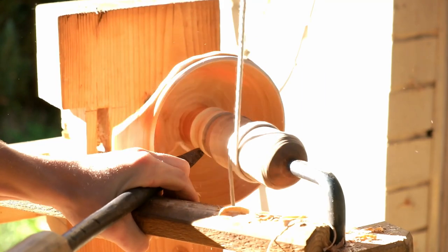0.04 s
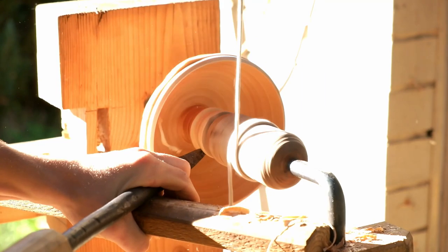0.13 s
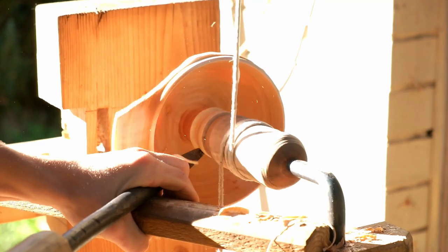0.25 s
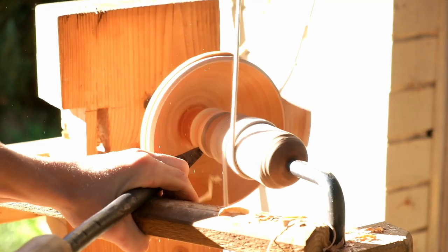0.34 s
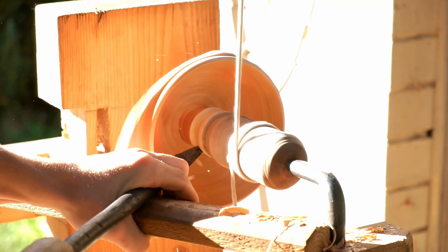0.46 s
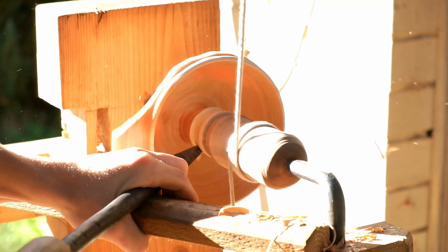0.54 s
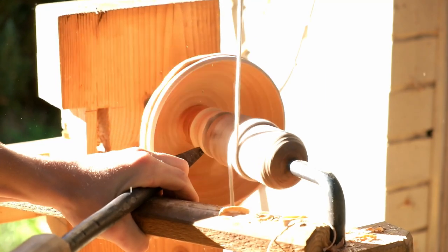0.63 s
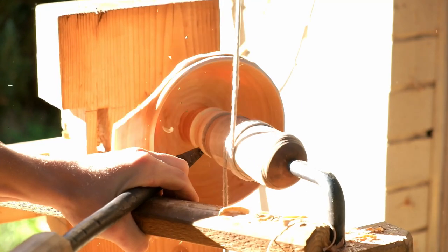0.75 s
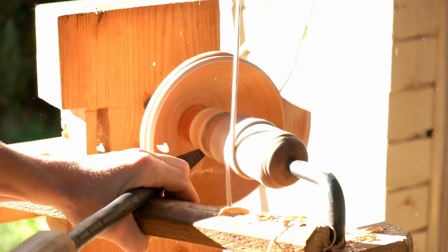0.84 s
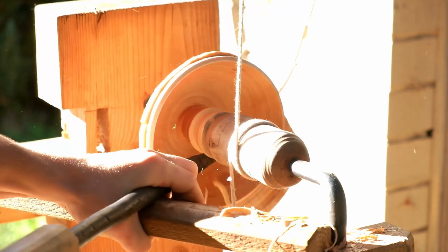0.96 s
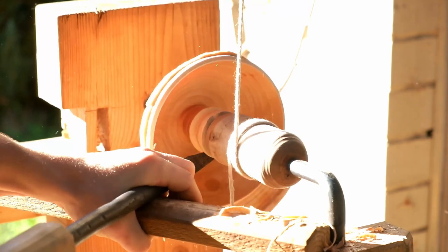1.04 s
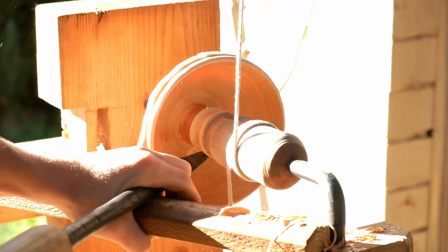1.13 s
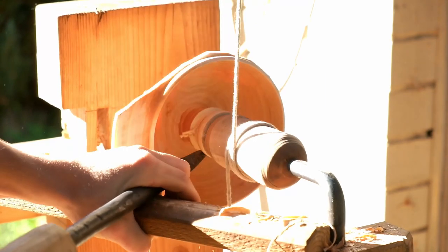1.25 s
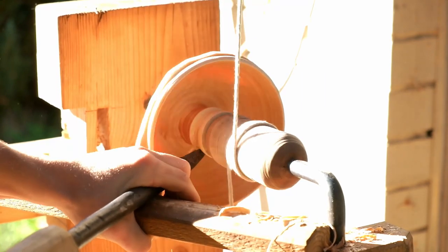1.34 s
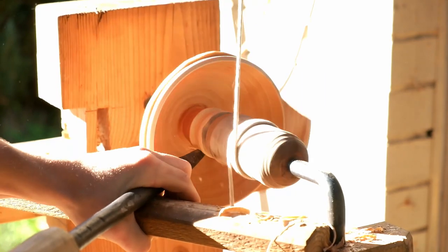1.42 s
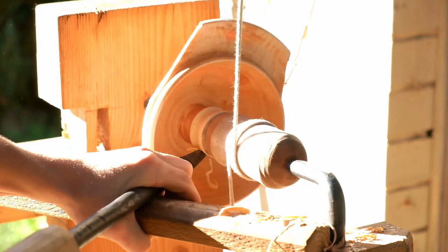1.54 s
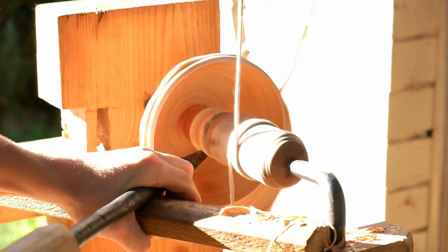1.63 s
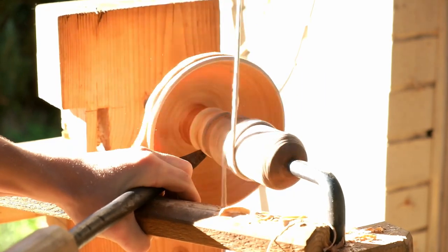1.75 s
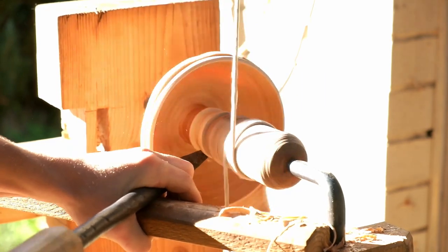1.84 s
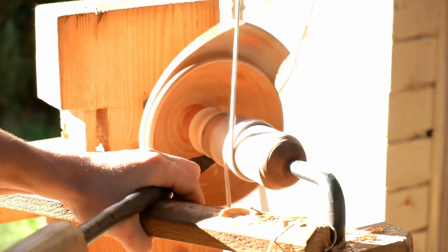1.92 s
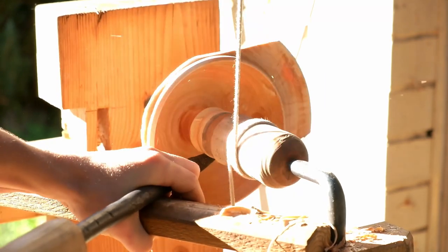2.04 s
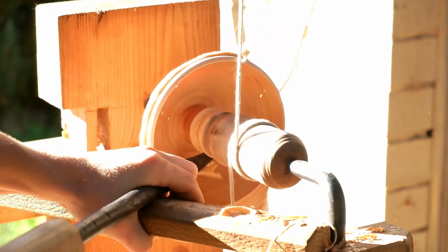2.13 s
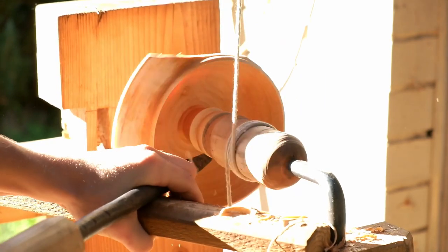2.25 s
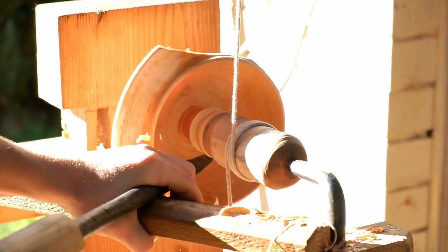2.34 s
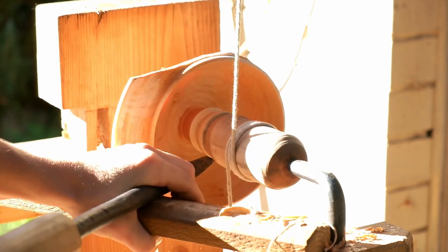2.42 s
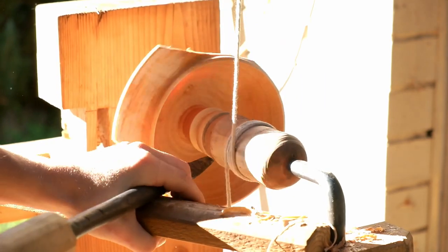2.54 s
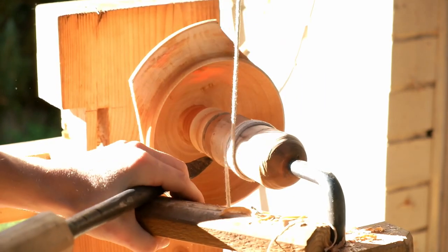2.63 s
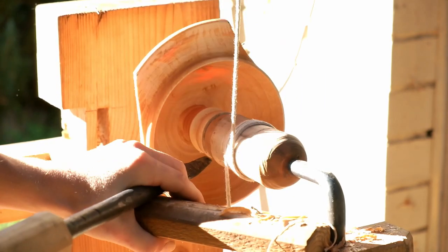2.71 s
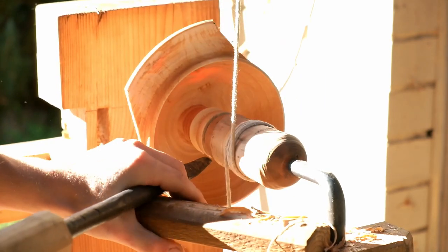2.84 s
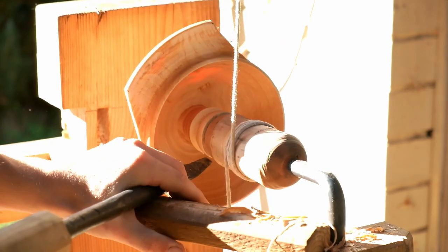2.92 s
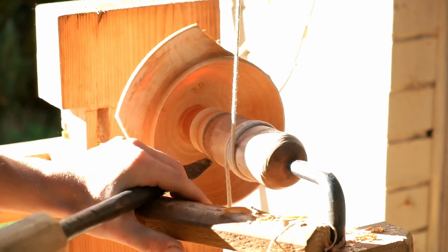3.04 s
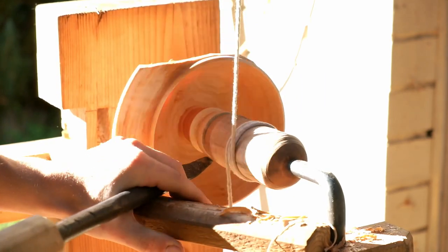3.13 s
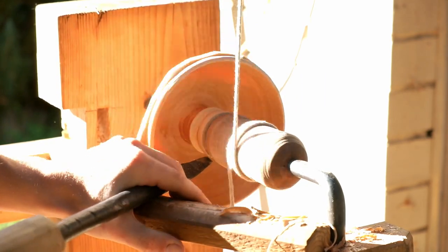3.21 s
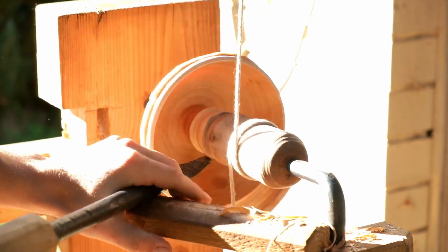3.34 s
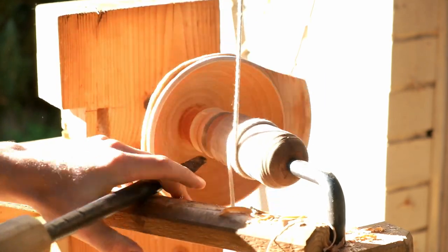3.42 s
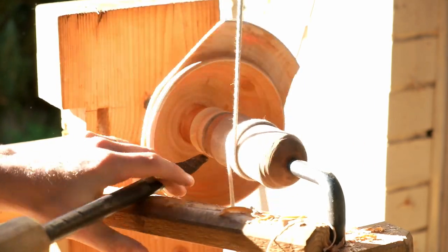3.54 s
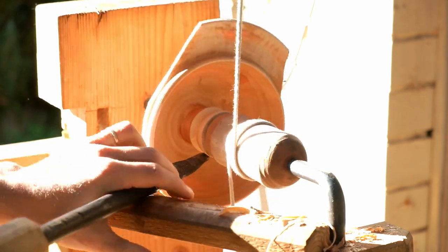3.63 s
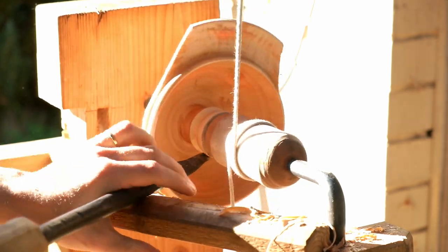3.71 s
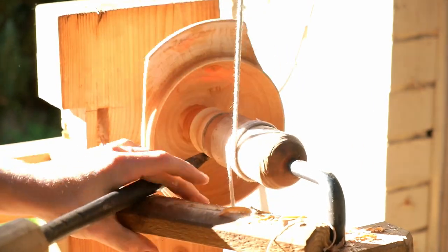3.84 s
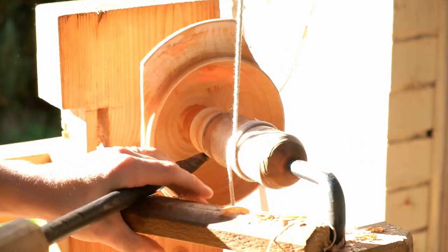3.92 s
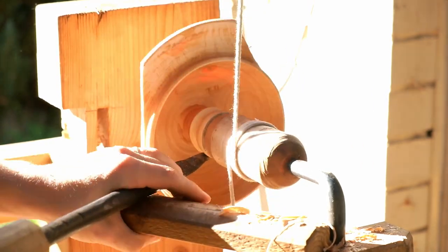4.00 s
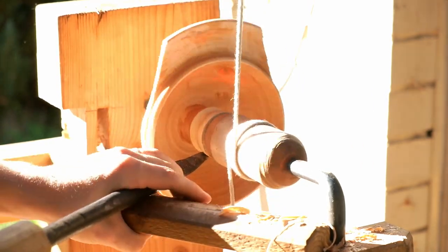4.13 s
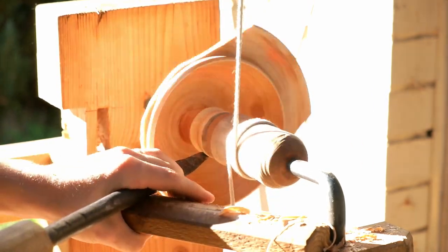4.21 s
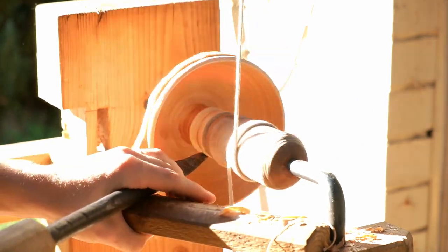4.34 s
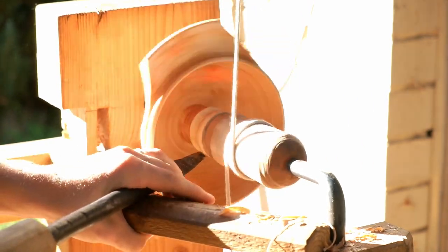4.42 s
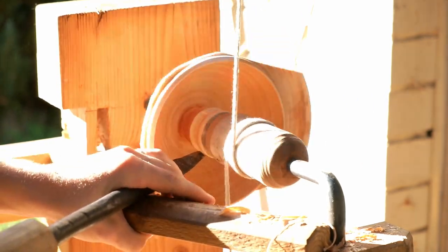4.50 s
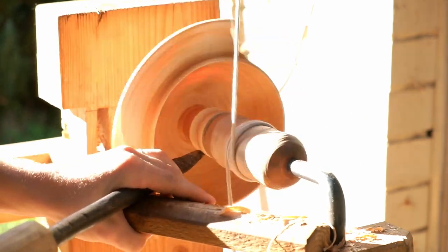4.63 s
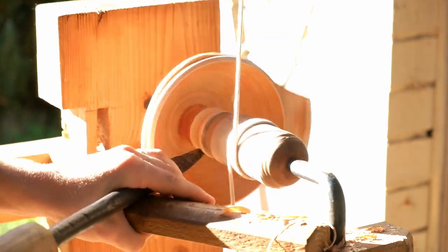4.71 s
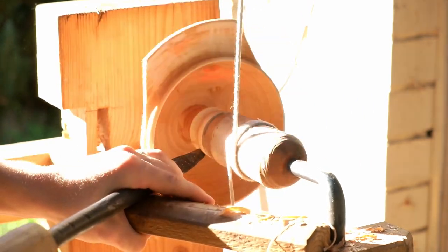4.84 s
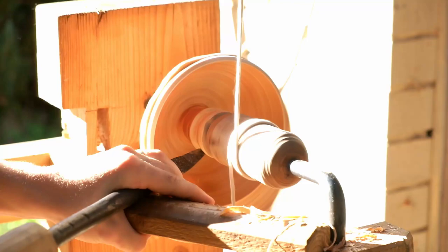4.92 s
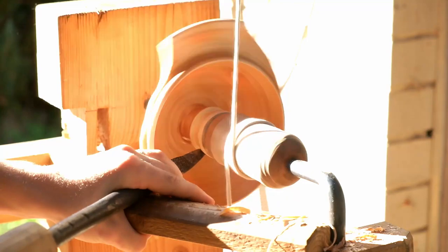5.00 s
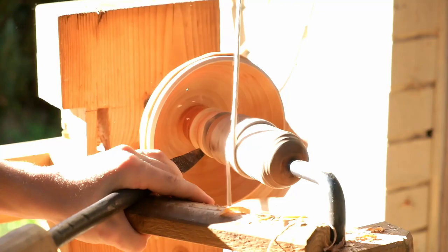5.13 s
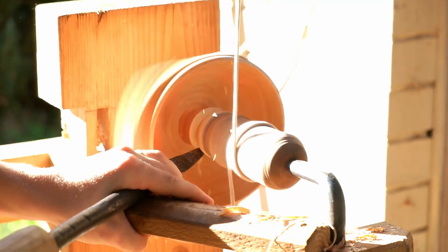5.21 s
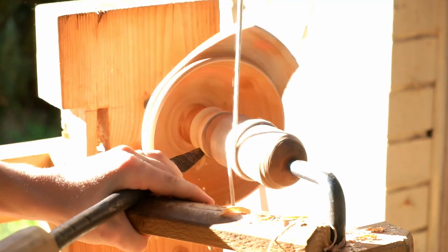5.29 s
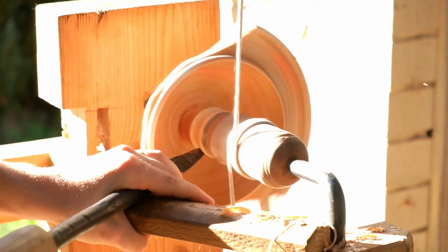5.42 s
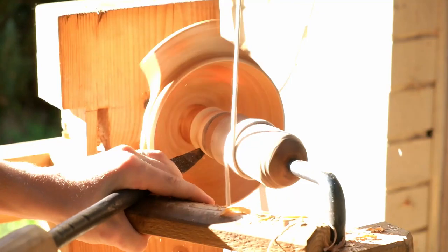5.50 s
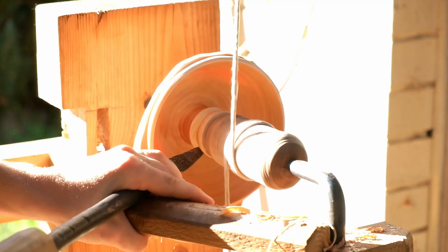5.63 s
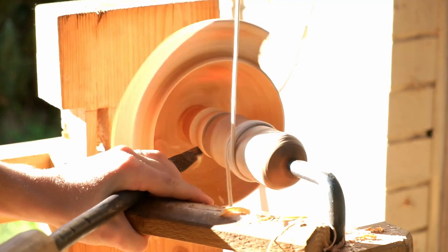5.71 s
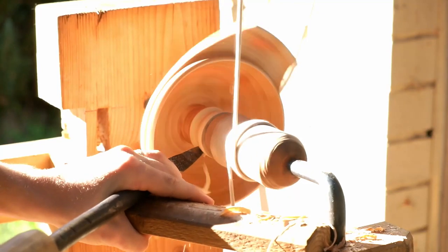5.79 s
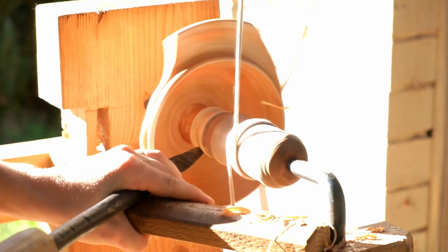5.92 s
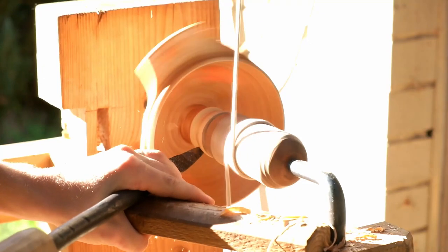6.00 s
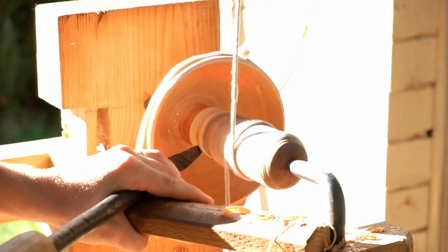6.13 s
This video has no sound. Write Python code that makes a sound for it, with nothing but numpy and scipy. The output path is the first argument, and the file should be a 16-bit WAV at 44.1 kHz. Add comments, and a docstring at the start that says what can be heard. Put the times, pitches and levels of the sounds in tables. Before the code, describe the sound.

In an open-sided shed, a treadle lathe turns wood against a steel edge. Crunchy, fibrous scrapes pulse steadily, bright with a hard metallic ring near four kilohertz and a hollow woody knock beneath. They give way to about two quiet seconds of faint clicks and distant low rumble, then small knocks lead into renewed, rhythmic scraping. Heard very close, fairly dry.

```python
"""Open-sided shed: a hook tool cuts a green-wood bowl on a treadle lathe, close to the microphone.
On each down-stroke snapping fibres ring lathe, bowl and tool; the edge bites harder a few times a stroke.
Between strokes the edge drags and ticks on the wood. Sources are random snaps and single blows through
resonances; short scattered echoes follow, over distant outdoor noise made by shaping a noise spectrum."""
import sys
import numpy as np
from scipy import signal
from scipy.fft import rfft, irfft
from scipy.io import wavfile
from scipy.ndimage import uniform_filter1d

SR = 44100
rng = np.random.default_rng(int(sys.argv[2]) if len(sys.argv) > 2 else 0)


def persist_wave(psi):
    """Save psi, clipped to +-1, as 16-bit WAV."""
    counts = np.round(np.clip(psi, -1, 1) * 32767).astype(np.int16)
    wavfile.write(sys.argv[1], SR, np.atleast_2d(counts).T)


N = 271656
T = np.arange(N) / SR

# Down-strokes of the treadle. Each row: start in seconds, then frame, blade and hiss levels in dB
# against the shank once the cut is loaded.
STROKES = [(-.15, -8, -2.5, -8), (.331, -13.5, -2.5, -10.5), (.83, -7.5, -3, -9.5), (1.385, -6, -6, -13.5),
           (1.859, -1, -2, -10), (4.772, -16, -11, -13.5), (5.189, -10, -7.5, -11),
           (5.675, -14.5, -7.5, -11)]


def undb(db):
    """Decibels to gain."""
    return 10 ** (np.asarray(db) / 20)


def unit(x):
    """Scale to rms 1."""
    return x / np.sqrt(np.mean(x ** 2))


def walk(rate_hz):
    """Random levels held 1 / rate_hz seconds and slewed; spread near 1."""
    hold = int(SR / rate_hz)
    steps = np.repeat(rng.standard_normal(N // hold + 1), hold)
    return 1.175 * uniform_filter1d(steps, hold)[:N]


def fibres(per_s, spread_db):
    """Fibres snap at random moments, a few much harder than the rest."""
    snaps = rng.random(N) < per_s / SR
    return snaps * rng.standard_normal(N) * undb(spread_db * rng.exponential(size=N))


def ring(x, modes, shift_db):
    """Two-pole resonances; as the bowl turns and the tool rolls, each is driven now harder, now softer."""
    out = 0
    for k, (hz, width_hz, db) in enumerate(modes):
        b, a = signal.iirpeak(hz, hz / width_hz, SR)
        driven = x * undb(db + shift_db * walk(40))
        out = out + (-1) ** k * signal.lfilter(b, a, driven)
    return out


def bite(start_s, shank_db, bowl_db, hold_ms):
    """The edge digs in; colour and swell follow from how far the stroke has gone."""
    stroke_s, load_s, unloaded_db = .21, .15, -18.5  # the frame takes the load slowly
    entry_swell_ms, loaded_swell_ms = 9.6, 24.1  # per 20 dB: sharp entry, smeared later
    return_frame_db, return_hiss_db, return_swell_ms = 2, -8, 13
    rest_db = -14  # tool rest against the blade
    fall_ms = 26.3  # per 20 dB

    stroke_start_s, frame_db, blade_db, hiss_db = [row for row in STROKES if row[0] <= start_s][-1]
    since_s = start_s - stroke_start_s
    load = min(since_s / load_s, 1)
    swell_ms = entry_swell_ms + load * (loaded_swell_ms - entry_swell_ms)
    if since_s > stroke_s:  # return touches tear fewer fibres and load the frame differently
        frame_db += return_frame_db
        hiss_db += return_hiss_db
        swell_ms = return_swell_ms
    frame_db += unloaded_db * (1 - load)
    parts_db = np.array([frame_db, bowl_db, 0, blade_db, hiss_db, blade_db + rest_db])
    return start_s, shank_db + parts_db, swell_ms, hold_ms, fall_ms


def tick(start_s, shank_db, bowl_db, treble_db, fall_ms):
    """A catch or falling chip: sudden and short."""
    swell_ms, hold_ms = .6, 2.57  # swell per 20 dB
    # Offsets in dB: frame against bowl, blade against shank, hiss against treble, rest against treble.
    offsets_db = [-12.5, -13, -1.5, 4.5]
    frame_db, blade_db, hiss_db, rest_db = np.array([bowl_db, 0, treble_db, treble_db]) + offsets_db
    parts_db = np.array([frame_db, bowl_db, 0, blade_db, hiss_db, rest_db])
    return start_s, shank_db + parts_db, swell_ms, hold_ms, fall_ms


def force():
    """Drive of frame, bowl, shank, blade, hiss and tool rest: rubbing (drag, bites, ticks) and single blows."""
    # Pressure of the dragging edge. Each row: time in seconds, nominal level in dB.
    drag = [(0, -51), (.1, -51.5), (.28, -57), (.56, -53.5), (.78, -54.5), (1.0, -50.5), (1.2, -65),
            (1.33, -78.5), (1.57, -59), (1.8, -57.5), (2.08, -57), (2.26, -59.5), (2.4, -79), (3.0, -79.5),
            (3.4, -77), (3.9, -77.5), (4.05, -84), (4.2, -67), (4.74, -77), (4.87, -59), (5.14, -66),
            (5.4, -58.5), (5.55, -66.5), (5.89, -55), (6.16, -63)]
    # Edge digging in. Each row: start in seconds, shank level in dB, bowl against shank in dB, hold in ms.
    bite_rows = [(0.0044, -34.5, 3, 20.6), (0.1964, -46, 2.5, 5.2), (0.2416, -52.5, 6, 6.3),
                 (0.338, -40.5, 2.5, 16), (0.358, -26.5, -2.5, 8.2), (0.393, -23.5, -6, 13.6),
                 (0.427, -20.5, 2, 8.7), (0.4647, -19.5, -1, 3.8), (0.498, -27.5, 2.5, 5.5),
                 (0.5183, -29, -1.5, 5.1), (0.7397, -49.5, 1, 8.3), (0.8354, -44.5, -8, 10),
                 (0.858, -30, -3, 28), (0.8984, -21, -4.5, 11.6), (0.9424, -19.5, -2, 11),
                 (0.9744, -34.5, -7, 5.3), (1.387, -40, -4, 32), (1.422, -34, -4, 19.5),
                 (1.45, -38.5, -3.5, 27), (1.493, -35, -3.5, 23.5), (1.52, -43.5, 1.5, 26),
                 (1.801, -46, 6.5, 4.4), (1.866, -36.5, -2.5, 17), (1.8863, -28, -5, 26),
                 (1.9633, -24, -5.5, 4.3), (1.989, -31.5, 1, 15), (2.02, -36, 3, 11), (2.048, -35, 4, 6.8),
                 (2.1104, -56, -8, 11), (4.778, -35, -3.5, 5.9), (4.791, -38, -5.5, 31),
                 (4.909, -52, 7, 7.1), (4.922, -46, 3.5, 17), (4.948, -55, 6, 3), (5.194, -53, 6, 12),
                 (5.225, -29, -4, 8.6), (5.255, -28, -7.5, 7), (5.274, -23.5, -7, 10.6),
                 (5.308, -33.5, 5.5, 13.5), (5.3467, -33, -2.5, 16.6), (5.4594, -47.5, 1.5, 4.8),
                 (5.68, -33, -6, 11), (5.696, -29, -2.5, 14), (5.744, -23.5, -17, 7.6),
                 (5.7674, -31.5, 6, 3), (5.784, -21, -12.5, 10.4), (5.812, -32.5, 2, 12),
                 (5.8423, -29.5, -2.5, 8.2), (5.9747, -43, 1, 5.9), (6.029, -40.5, 4.5, 2.8)]
    # Catches and falling chips. Each row: start in seconds, shank level in dB, bowl and treble against
    # shank in dB, fall in ms per 20 dB.
    tick_rows = [(1.158, -54, 2.5, -9, 51), (1.2572, -52, -10.5, -27.5, 10),
                 (1.655, -40.5, 3.5, -16.5, 8.3), (1.6933, -40.5, 7, -5, 17), (1.761, -53, 10.5, -11, 24),
                 (1.9405, -17, -2.5, -15, 11), (1.989, -28.5, -14, -4.5, 8.9), (2.188, -55, 2, -8, 47),
                 (2.2156, -33, -.5, -7.5, 14.6), (2.3371, -56, -14, -24, 11), (2.4492, -71.5, 2, -7, 19),
                 (2.582, -55.5, -11, -14, 16), (3.1184, -60, -2.5, -12.5, 14), (3.335, -59.5, 2, -17.5, 14),
                 (3.3504, -55.5, 0, -13, 28), (3.5247, -64, -7, -16, 10), (3.54, -59, -5, -15.5, 10),
                 (3.5717, -57.5, 6.5, -10.5, 9.3), (3.7717, -60.5, 3, -22.5, 15),
                 (4.2453, -51, 4.5, -17, 29), (4.2743, -42, 4.5, -11, 8.9), (4.4993, -52.5, 4, -22, 12),
                 (4.5214, -43.5, 5.5, -14, 12), (4.6705, -51.5, 4, -12.5, 17), (4.734, -60.5, 10, -9, 14),
                 (4.9877, -36.5, -2.5, -16, 30), (4.997, -29.5, -15, -16, 16), (5.0294, -52, -9, -7, 20),
                 (5.0673, -58, 10, -26, 9.8), (5.139, -54.5, 3, -17, 23), (5.5292, -51.5, 7, -31, 11),
                 (5.5636, -59, 15.5, -13, 21), (5.5979, -42.5, 3, -18, 15), (5.6291, -55, -6, -16, 14),
                 (5.727, -25.5, 5.5, -16, 9), (5.819, -36, -6, -8, 5.7), (6.0645, -43.5, 1, -14.5, 15),
                 (6.1235, -46.5, 3, -23, 14)]
    # Drag response, frame to rest: level in dB at a drag of -59.5 dB.
    drag_parts_db = [-57, -56, -58.5, -66.5, -74, -72.5]
    # Drag response, frame to rest: dB gained per dB of drag.
    drag_slopes = [0.61, 0.57, 1, 1.1, 1.1, 0.91]
    # First hard contact of a tick, frame to rest: dB over its rubbing.
    blow_db = [14.6, 15.4, 15.7, 6.6, 19, 16]
    lift_db, lift_ms = -9, 23  # the edge eases off around the start of each down-stroke

    lift = sum(np.clip(1 - np.abs(1000 * (T - row[0]) / lift_ms + .5), 0, 1) for row in STROKES)
    drag_db = np.interp(T, *np.transpose(drag)) + lift_db * lift + 59.5
    flutter_db = 3 * walk(30)
    crackle = 1 + 60 * uniform_filter1d(fibres(80, 1) ** 2, size=60)  # dry splinters flick the edge
    power = np.array([crackle * undb(db + slope * drag_db + flutter_db) ** 2
                      for db, slope in zip(drag_parts_db, drag_slopes)])

    bites = [bite(*row) for row in bite_rows]
    ticks = [tick(*row) for row in tick_rows]
    for start_s, db, swell_ms, hold_ms, fall_ms in bites + ticks:
        near = slice(max(int((start_s - .1) * SR), 0), int((start_s + .3) * SR))
        ms = 1000 * (T[near] - start_s)
        swell = np.minimum(ms, 0) / swell_ms
        fall = np.maximum(ms - hold_ms, 0) / fall_ms
        power[:, near] += undb(db[:, None] + 20 * (swell - fall)) ** 2

    blows = np.zeros_like(power)
    for start_s, db, *_ in ticks:
        blows[:, int(start_s * SR)] += undb(db + blow_db)
    return np.sqrt(power), blows


def cutting():
    """Snapping fibres and blows ring lathe, bowl and tool; fine snaps through high, broad bands are the hiss."""
    # Resonances of lathe frame, bowl, tool shank, blade, tearing fibres and tool rest.
    # Each row: centre in Hz, width in Hz, drive in dB relative to the other modes of its part.
    frame_modes = [(35, 51, -7), (129.8, 36.3, -9.5), (199.6, 43, -4.5), (305.4, 150, -3.5),
                   (418.5, 103, 3)]
    # Bowl, same columns: centre in Hz, width in Hz, relative drive in dB.
    bowl_modes = [(515.6, 54, -7.5), (721, 80, -5.5), (812.6, 52, 0), (916.4, 68, 3.5), (1055, 69.5, 3.5),
                  (1326, 104, 0), (1454, 94, -4), (1782, 406, -7)]
    # Tool shank, same columns: centre in Hz, width in Hz, relative drive in dB.
    shank_modes = [(2317, 300, -8.5), (2730, 190, -6.5), (3222, 290, -4.5), (3648, 198, 2.5),
                   (3760, 186, 1.5), (3875, 130, 0.5), (4332, 180, -8.5)]
    # Blade, same columns: centre in Hz, width in Hz, relative drive in dB.
    blade_modes = [(4734, 250, -6), (5006, 120, -0.5), (5097, 162, -0.5), (5498, 230, -9)]
    # Tearing fibres, same columns: centre in Hz, width in Hz, relative drive in dB.
    hiss_modes = [(6270, 1200, -1), (8320, 910, -2.5), (9420, 1000, -0.5), (11750, 1700, -1.5),
                  (14030, 7100, -10.5)]
    # Tool rest, same columns: centre in Hz, width in Hz, relative drive in dB.
    rest_modes = [(1920, 230, -6), (2594, 100, 5.5), (2578, 180, -5), (5756, 250, 2.5), (6010, 230, -2),
                  (7100, 250, -9)]

    coarse, fine = fibres(8000, 2.05), fibres(16000, 1.3)
    parts = ((coarse, frame_modes, 2.1), (coarse, bowl_modes, 2.5), (fine, shank_modes, 2.1),
             (fine, blade_modes, 2.1), (fine, hiss_modes, 1.1), (fine, rest_modes, 2.5))
    chatter = undb(.81 * walk(220))  # the edge skips over the uneven grain
    out = 0
    for push, blow, (snaps, modes, shift_db) in zip(*force(), parts):
        _, width_hz, db = np.transpose(modes)
        passed_power = undb(db) ** 2 * width_hz * np.pi / SR  # per mode
        drive = unit(snaps * chatter) * push + blow
        out = out + ring(drive, modes, shift_db) / np.sqrt(passed_power.sum())
    return out


def shed(x):
    """Scattered echoes of posts and roof, dull and short."""
    t60_s, echo_db = .27, -17
    t = T[:SR // 2]
    tail = rng.standard_normal(len(t)) * undb(-60 * t / t60_s) * (t > .006)
    tail = signal.lfilter(*signal.butter(1, 5000, fs=SR), tail)
    tail /= np.sqrt(np.sum(tail ** 2))
    return x + undb(echo_db) * signal.fftconvolve(x, tail)[:N]


def outdoors():
    """Distant rumble and a tyre-like band near 900 Hz: shaped noise drifting slowly in level."""
    # Spectrum of the wash. Each row: frequency in Hz, relative density in dB per Hz.
    spectrum = [(12, -43.5), (20, -6), (60, -5), (74, -4), (91, -13.5), (234, -16.5), (285, -16),
                (337, -23), (607, -20.5), (875, -7), (1120, -21), (1370, -26.5), (2020, -29), (6010, -49.5),
                (16000, -49.5)]
    level_db, drift_db, drift_hz = -57, 1.0, 1.7
    hz, db = np.transpose(spectrum)
    bins_hz = np.maximum(np.arange(N // 2 + 1) * SR / N, 1)
    gain = undb(np.interp(np.log(bins_hz), np.log(hz), db))
    wash = irfft(rfft(rng.standard_normal(N)) * gain, N)
    return undb(level_db + drift_db * walk(drift_hz)) * unit(wash)


def scene():
    """Lathe in the shed over the outdoor wash."""
    return (shed(cutting()) + outdoors())[None]


def record(dry):
    """Steep low-pass: almost nothing is heard above 15.7 kHz."""
    top_hz = 15700
    low_pass = signal.ellip(10, .2, 80, top_hz, fs=SR, output="sos")
    return signal.sosfilt(low_pass, dry)


dry = scene()
out = record(dry)
persist_wave(out)
```